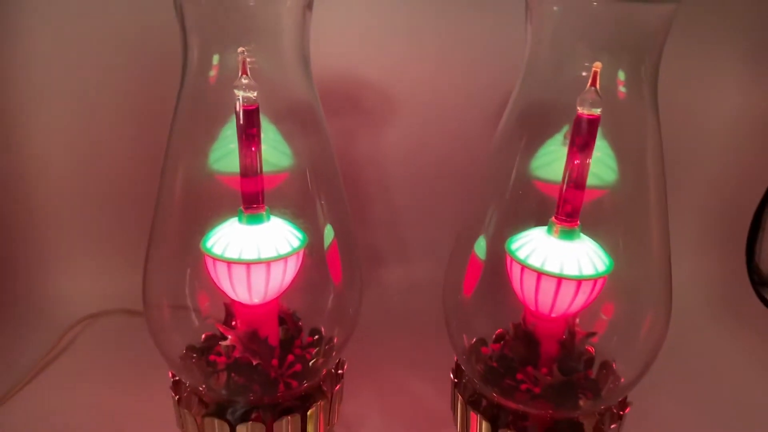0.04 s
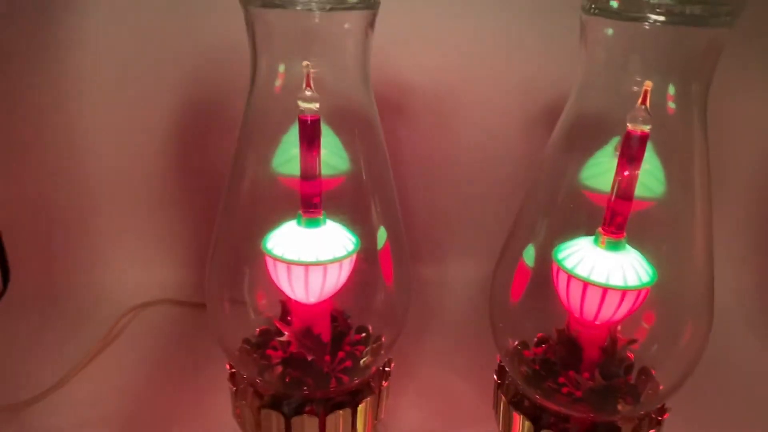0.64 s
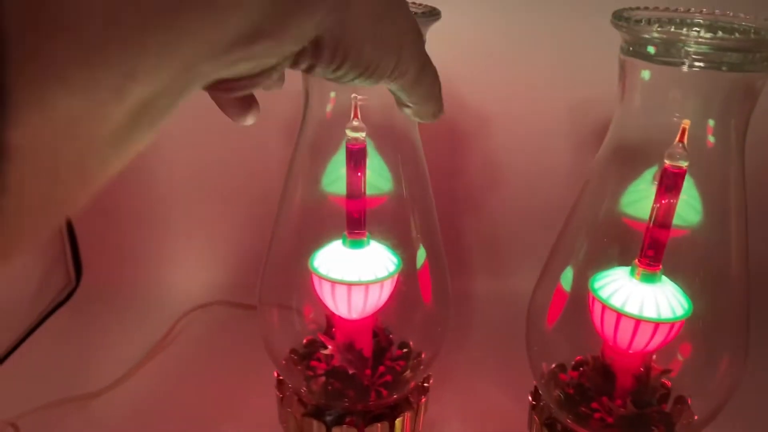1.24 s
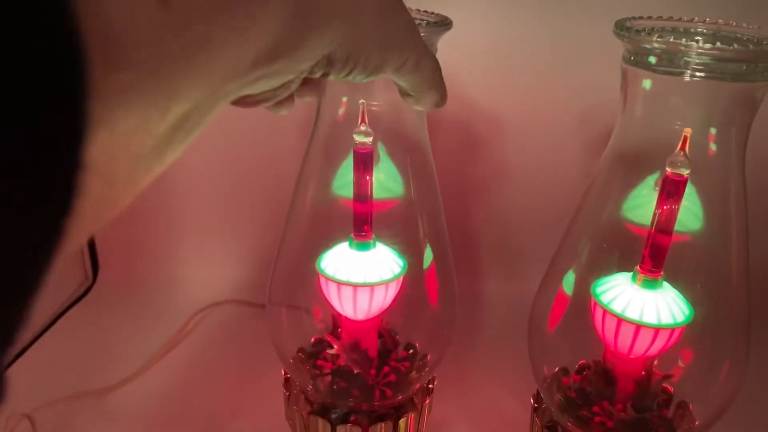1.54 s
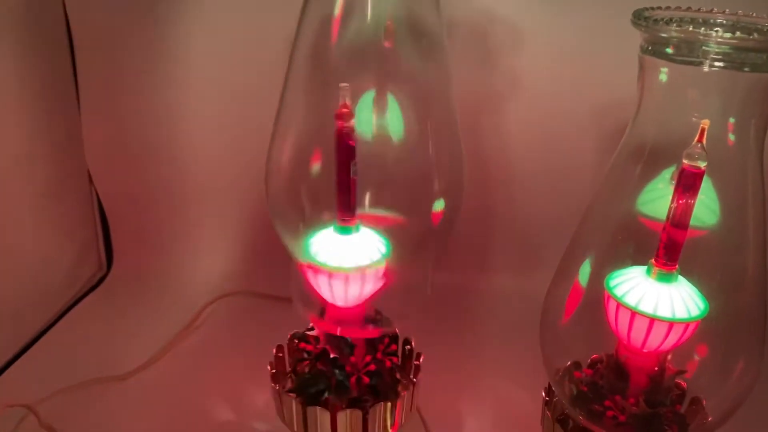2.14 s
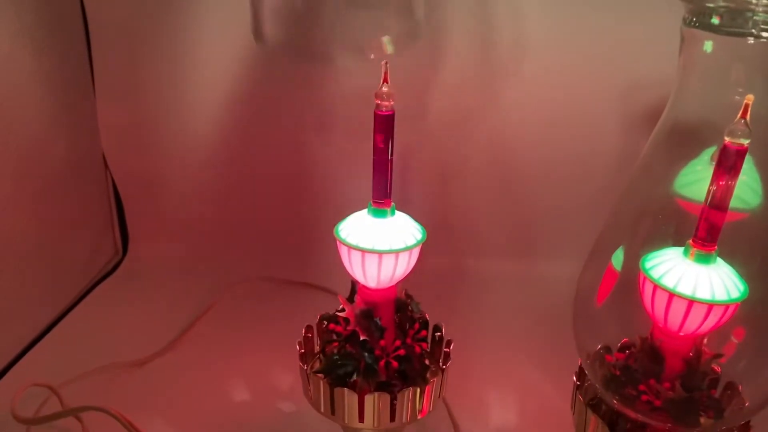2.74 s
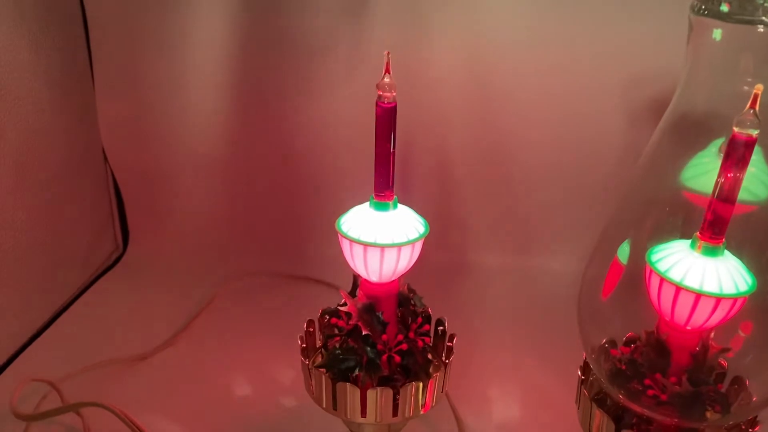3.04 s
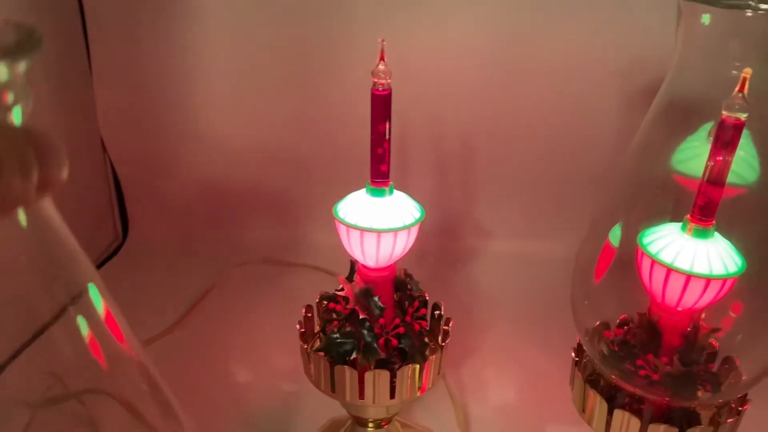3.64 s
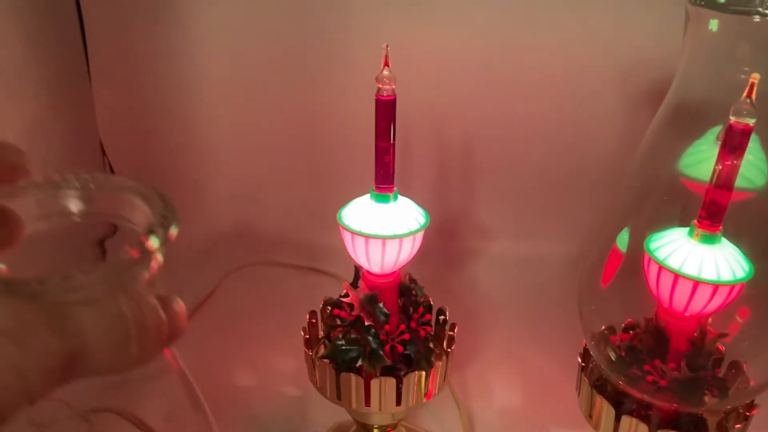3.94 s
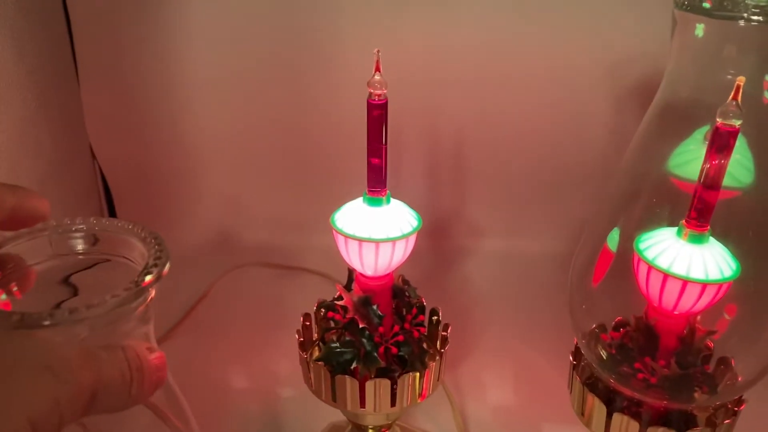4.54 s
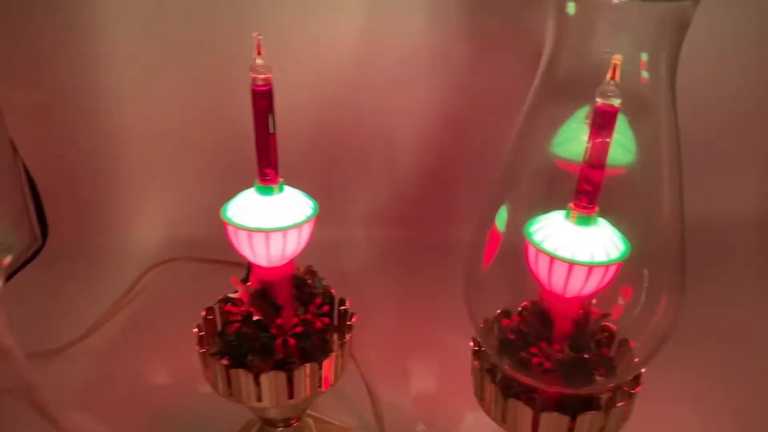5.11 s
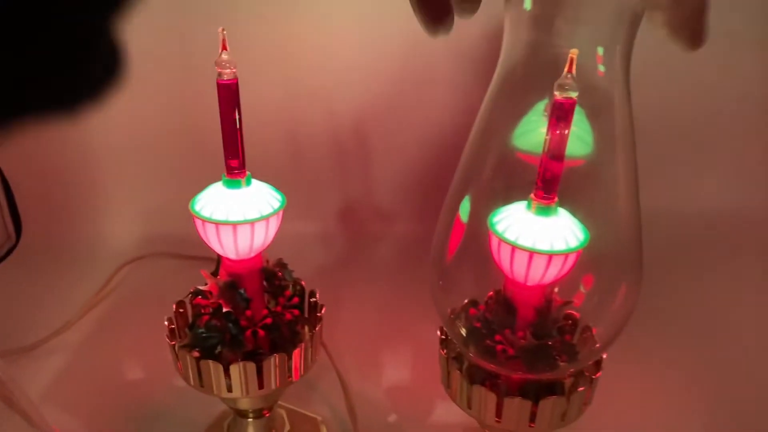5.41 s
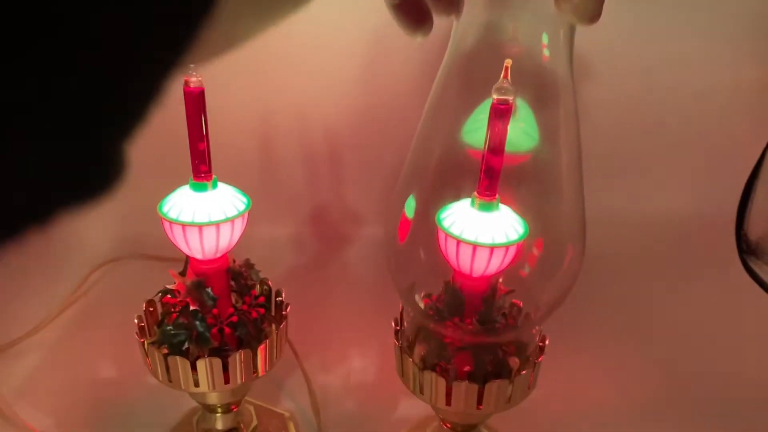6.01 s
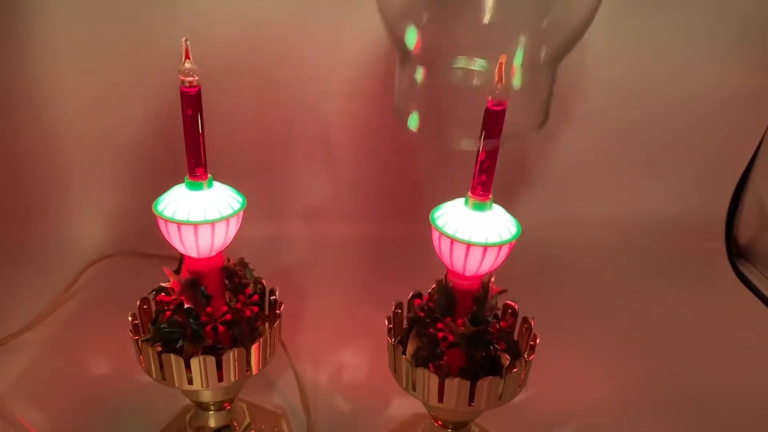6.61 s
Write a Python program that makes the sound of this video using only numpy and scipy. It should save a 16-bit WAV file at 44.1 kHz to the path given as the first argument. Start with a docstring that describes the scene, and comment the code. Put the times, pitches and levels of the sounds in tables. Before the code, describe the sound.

Close by in a quiet room, a glass lamp chimney scrapes out of its brass holder, the prongs snapping sharply off the rim. It clinks against the bulb and rings with a clear, wavering note. A sleeve rustles faintly and the glass is set on the table with a soft knock. Then a second chimney scrapes free, clinks and rings slightly higher, over a faint low rumble.

```python
"""A quiet room: two glass chimneys are lifted off small lamps, one after the other, close by.
Each scrapes out of its springy brass crown, whose prongs snap off the rim, then clinks against the bulb.
Uneven walls split the lowest bell mode of the glass in two, so its note beats.
The first chimney is set down on the table in between. Fingers tap, the table thuds,
and a sleeve rustles as the arm moves, over a low rumble and faint air."""
import sys
import numpy as np
from scipy import signal
from scipy.fft import rfft, irfft, next_fast_len
from scipy.io import wavfile
from scipy.ndimage import uniform_filter1d

SR = 44100
rng = np.random.default_rng(int(sys.argv[2]) if len(sys.argv) > 2 else 0)


def generate_wav(sig):
    """Save sig (samples, or channels by samples) to the path in sys.argv[1] as 16-bit PCM at SR."""
    pcm = np.round(np.clip(np.atleast_2d(sig).T, -1, 1) * 32767).astype(np.int16)
    wavfile.write(sys.argv[1], SR, pcm)


N = 298557
TIME = np.arange(N) / SR

# Levels are relative within each layer.
# spectra: f/Hz, level/dB
RUMBLE_SPECTRUM = [(15, -33.5), (28, -16.5), (40, 1), (60, 4.5), (105, 0.5), (135, -6), (193, -9.5),
                   (330, -25), (500, -42), (900, -89.5)]
AIR_SPECTRUM = [(100, 2), (250, 4.5), (500, 1), (900, -3), (1250, 3.5), (1700, -13.5), (2600, -15),
                (4000, -17), (6500, -20), (9000, -23), (15500, -31)]  # also the sleeve's folds
FIBRE_SPECTRUM = [(150, 6), (400, 4.5), (800, 7), (1200, 2), (1800, 0.5), (3200, 2.5), (5500, -1.5),
                  (8000, -7), (11000, -9.5), (15500, -8)]
SCRAPE_SPECTRUM = [(200, -11.5), (500, 5.5), (750, -1), (1100, -6.5), (1900, -4), (3600, -3), (5400, -3),
                   (6500, -5), (8000, -12), (10000, -19), (11500, -16.5), (15500, -27)]
PRONG_SPECTRUM = [(100, -12.5), (550, -12.5), (850, -21.5), (1500, 3), (2600, -2), (3700, 0), (4600, -8),
                  (6800, -8.5), (7800, -4.5), (8600, -12), (10000, -12), (11100, -10), (12200, -14),
                  (16000, -19)]
KNOCK_SPECTRUM = [(60, -4), (200, -5), (320, 1.5), (500, -5.5), (800, 3), (1050, -3), (1500, 4.5),
                  (2400, -4.5), (3200, -15.5), (5000, -21.5), (8000, -21.5), (11000, -25), (16000, -36.5)]

# room decay: f/Hz, t60/s
ROOM_DECAY = [(100, 0.3), (500, 0.12), (2000, 0.16), (8000, .15), (16000, 0.043)]
# likeness of left and right: f/Hz, coherence
COHERENCE = [(100, 1), (300, 0.51), (700, 0.5), (1800, 0.28), (3500, 0.23), (5300, .5), (7000, .8),
             (9000, 1), (16000, 0.99)]
# stereo widening, treble phase of the right channel against the left: f/Hz, lag/rad
WIDENING_LAG = [(100, 0), (7000, 0), (8000, -1.3), (9000, -3.1), (10000, -4.4), (10600, -6.28),
                (11600, -6.28), (13000, -9.4), (13700, -9.6), (14600, -12.57)]

# modes: f/Hz, level/dB, t60/s
TABLE_MODES = [(83.7, 0, 0.071), (103, -10, .08), (135, -16, 0.1), (170, -24, 0.26)]
RUBBED_MODES = [(485, -5, 0.071), (752.4, -3, 0.27), (2010, -4.5, .08), (2600, -2, 0.13), (3560, 0, .07),
                (3680, -3, .09), (4647, 0, .14), (6318, -1, 0.16), (7640, -6, 0.08), (11400, -10, .1)]
FOOT_MODES = [(535, -24, .22), (1442, -11.5, .1), (1795, -11, 0.058), (2420, -14, .115), (3159, -19, .13),
              (3215, -17, 0.15), (3510, -13.5, .12), (3665, 3, 0.075), (3736, -7, .13), (3900, -19, .073),
              (4210, -24.5, .7), (5960, -24, .14), (6285, -27, .22), (6450, -20, .14), (6750, -22, .15),
              (7500, -18.5, .14), (7700, -13, 0.17), (7520, -13.5, .16), (7842, -12, .11),
              (8150, -15.5, .2), (10950, -16, 0.17), (11030, -14.5, 0.16), (11330, -14.5, 0.33),
              (15150, -26.5, .1)]  # gripped chimney struck on its foot
BULB_MODES = [(400, -9, .07), (440, -9, .07), (555, -9, .07), (715, -5, .06), (750, -2, .06),
              (894, -6, .06), (1733, -5, .06), (1915, -6, .06), (2240, -8, .06), (2380, -7, .05)]  # plastic shade and stem
OVERTONES_A = [(2464, -13, .3), (2757, -18, 0.17), (3640, -8, .08), (3598, -11, .16), (4249, -35.5, .22),
               (4444, -4, 0.2), (5490, -18.5, 0.069), (6370, -29.5, 0.28), (6360, -19, 0.57),
               (6560, -15, .07), (7820, -23, 0.088), (7900, -15, .12), (10900, -23, 0.13),
               (12130, -32.5, .07), (14970, -38, .08)]  # first chimney
OVERTONES_B = [(2336, -12, .12), (2600, -21, .18), (3490, -12, .21), (3590, -17, .13), (3768, -27, .15),
               (4638, -4, .1), (4662, -12, .1), (6250, -18, .18), (7520, -18, .07), (8108, -26, .14),
               (8158, -24, .14), (10500, -28, .07)]  # second chimney
# split bell mode: f/Hz, level/dB, t60/s, balance/dB, right lag/rad, drift as the glass turns/(rad/s)
TWINS_A = [(1303.4, 0, 1.5, 5, -2.3, 4.6), (1323.9, 1, 1.05, -.5, 2, .9)]
TWINS_B = [(1352.6, 0, 1.35, -1, .7, -.8), (1378.4, -.3, 1.1, -1.5, -1.5, -1.4)]

# sleeve drags: t/s, length/s, catch/s, release/s, end level/dB
SLEEVE_DRAGS = [(0.557, 0.2, 0.035, 0.02, -61), (2.67, .23, 0.24, .045, -59),
                (2.954, 0.15, .02, 0.2, -64.5), (3.236, 0.064, 0.043, 0.13, -61),
                (4.04, .03, 0.021, 0.093, -69), (4.701, 0.239, 0.042, 0.022, -57.5),
                (5.3, .04, .03, .25, -83.5)]
# arm reaches: t/s of fastest motion, half length/s, level/dB
ARM_REACHES = [(0.805, 0.37, -74), (1.35, 0.27, -77), (2.939, 0.23, -68.5), (3.353, .2, -73.5),
               (4.092, 0.2, -72.5), (4.963, 0.21, -70.5), (5.249, 0.28, -92.5)]
# table thuds: t/s, level/dB
TABLE_THUDS = [(0.186, -39.5), (1.08, -46.5), (1.746, -41), (1.848, -37.5), (1.895, -35), (1.931, -23.5),
               (2.009, -23.5), (2.09, -27.5), (2.119, -31), (2.201, -32.5), (3.018, -38.5), (4.048, -30.5),
               (5.997, -27), (6.198, -38.5), (6.26, -33)]
# fingers, cord and glass on the table: t/s, knock level/dB, f/Hz, width/oct, tick level/dB
TABLE_TAPS = [(0.1775, -43, 704, 0.55, -59), (0.227, -53, 760, 1.3, -66.5), (1.0744, -50, 1560, 0.28, -68),
              (1.738, -44.5, 880, .9, -63.5), (3.024, -51, 278, 0.26, -85), (3.63, -66, 700, 1.5, -94.5),
              (3.912, -63, 1300, 1.5, -50), (3.97, -75, 1305, 1.5, -64), (4.037, -42, 1000, 1.5, -50),
              (4.042, -37.5, 354, 0.32, -76), (4.119, -77, 600, 1.5, -67), (4.275, -61.5, 600, 1, -91),
              (4.352, -66.5, 1130, 0.35, -80), (5.332, -69.5, 900, 1, -79), (5.59, -73, 888, 1, -79.5)]
# glass rubs crown, fingers or bulb: t/s, length/s, catch/s, end level/dB of scrape and of rub
GLASS_PULLS = [(1.417, 0.051, .03, -78, -93), (1.582, 0.038, 0.0086, -67.5, -83),
               (1.677, 0.15, 0.032, -60.5, -67.5), (1.791, 0.096, .004, -51, -70),
               (1.881, 0.067, 0.0064, -41.5, -53.5), (1.947, .15, .004, -53.5, -50.5),
               (2.101, 0.076, .004, -44, -53), (3.249, 0.19, 0.048, -72.5, -71),
               (5.784, 0.166, 0.071, -54.5, -78), (5.934, 0.05, 0.0023, -42, -56),
               (6.175, 0.11, 0.02, -50.5, -48)]
# prongs spring off the glass: t/s, ring level/dB, crack level/dB
PRONG_SNAPS = [(1.8025, -44.5, -41), (1.834, -57, -44.5), (1.8934, -12.5, -12.5), (1.903, -30, -20),
               (1.9277, -33, -27.5), (1.943, -39, -34), (2.004, -50, -40), (2.083, -60.5, -43.5),
               (5.9384, -47.5, -46.5)]
# blows on the glass: t/s, note level/dB, overtone level/dB, tilt/(dB/oct), knock level/dB
BLOWS_A = [(1.894, -47, -31.5, 6, -51), (2.1122, -18, -20.5, -1.5, -20), (2.1542, -42, -31.5, -0.5, -26.5),
           (2.168, -31.5, -36.5, 10, -24), (2.178, -42, -42, 3.5, -45.5), (2.1968, -38.5, -41, 3.5, -27.5)]
BLOWS_B = [(5.975, -60, -56, 0, -67), (5.992, -61.5, -70, 0.36, -44), (6.1951, -28.5, -34.5, 0.73, -27),
           (6.199, -19.5, -28, 0.12, -24.5), (6.2162, -19, -33.5, 0, -20), (6.226, -27, -38, 0.069, -36),
           (6.259, -34, -36, 1.95, -31)]
SET_DOWN_A = [(3.915, -42.5, -51, 0.0089, -50.5)]  # on the table, still gripped


def amp(db):
    """Decibels to gain."""
    return 10 ** (np.asarray(db) / 20)


def unit_rms(x):
    """Scales to rms 1."""
    return x / np.sqrt(np.mean(x ** 2) + 1e-20)


def lookup(points, hz):
    """Interpolates a table over log frequency."""
    f, value = np.transpose(points)
    return np.interp(np.log(hz + 1), np.log(f + 1), value)


def add(mix, at_s, sound):
    """Mixes a sound in at at_s."""
    part = mix[..., round(at_s * SR):][..., :sound.shape[-1]]
    part += sound[..., :part.shape[-1]]


def cohere(x):
    """Makes two unrelated signals as alike as at two close microphone ports."""
    size = x.shape[-1]
    n_fft = next_fast_len(size)
    a, b = rfft(x, n_fft)
    same = np.clip(lookup(COHERENCE, np.fft.rfftfreq(n_fft, 1 / SR)), -1, 1)
    return irfft(np.array([a, same * a + np.sqrt(1 - same ** 2) * b]), n_fft)[:, :size]


def noise(size=N):
    """Partly coherent stereo white noise."""
    return cohere(rng.standard_normal((2, size)))


def colour(x, spectrum, size=4096):
    """Minimum-phase filter of unit energy; spectrum: f/Hz, level/dB."""
    gain_db = np.maximum(lookup(spectrum, abs(np.fft.fftfreq(size, 1 / SR))), -100)
    log_response = np.conj(signal.hilbert(np.log(amp(gain_db))))
    fir = np.fft.ifft(np.exp(log_response)).real
    return signal.oaconvolve(x, fir[None] / np.linalg.norm(fir), axes=1)[:, :x.shape[1]]


def hump(hz, width_oct, slope_db_per_oct=3):
    """Spectrum with one broad peak, duller above it."""
    grid_hz = np.geomspace(40, 20000, 160)
    away_oct = np.log2(grid_hz / hz)
    peak_db = -20 * np.log10(1 + (away_oct / width_oct) ** 2)
    return np.c_[grid_hz, peak_db - slope_db_per_oct * np.maximum(away_oct, 0)]


def patchy(x, depth_db, size=1024):
    """Narrow bands swell and fade at random."""
    bands = signal.stft(x, nperseg=size)[2]
    patches = uniform_filter1d(rng.standard_normal(bands.shape[1:]), size=4, axis=0)
    patches = unit_rms(uniform_filter1d(patches, size=5, axis=1))
    return signal.istft(bands * amp(depth_db * patches), nperseg=size)[1][:, :N]


def grains(per_s, spread_db):
    """Tiny random slips of uneven size."""
    strength = amp(spread_db * np.minimum(rng.exponential(1, N), 4))
    slipping = rng.random(N) < per_s / SR
    return unit_rms(cohere(strength * slipping * rng.standard_normal((2, N))))


def pull(start_s, length_s, catch_s, release_s=0.0048, build_db_per_s=50):
    """Friction envelope: catches, grows as the hand pulls harder, lets go."""
    past_end_s = TIME - start_s - length_s
    catch = np.clip((TIME - start_s) / catch_s, 0, 1)
    build = amp(build_db_per_s * np.minimum(past_end_s, 0))
    return catch * build * np.exp(-np.clip(past_end_s / release_s, 0, 20))


def burst(t60_s, rise_s=0.00027, size=16384):
    """Dense modes dying together, as decaying noise."""
    t = TIME[:size]
    return noise(size) * amp(-60 * t / t60_s) * (1 - np.exp(-t / rise_s))


def ring(modes, tilt_db_per_oct=0, scatter_db=2, chatter_db=2, pivot_hz=4000, size=14000):
    """Damped sines of one blow; the spot hit scatters their level and left-right phase."""
    t, out = TIME[:size], np.zeros((2, size))
    sides = np.array([[1], [-1]])
    for (hz, db, t60_s), (phase, strength, lag) in zip(modes, rng.standard_normal((len(modes), 3))):
        level_db = db + scatter_db * strength + tilt_db_per_oct * np.log2(hz / pivot_hz)
        out += amp(level_db - 60 * t / t60_s) * np.sin(2 * np.pi * (hz * t + phase) + .5 * lag * sides)
    # rim chatter roughens the start; the tail fades smoothly to silence
    chatter = unit_rms(uniform_filter1d(rng.standard_normal(size), size=150)) * np.exp(-t / 0.072)
    taper = np.cos(np.pi / 2 * t / t[-1]) ** 2
    rise = 1 - np.exp(-t / .0009)
    return out * rise * amp(chatter_db * chatter) * taper


def background(rumble_db=-61.5, air_db=-78):
    """Lumpy low rumble under faint, restless air."""
    swell = unit_rms(np.interp(TIME, np.linspace(0, TIME[-1], num=70), rng.standard_normal(70)))
    rumble = unit_rms(colour(noise(), RUMBLE_SPECTRUM) * amp(3.1 * swell))
    air = patchy(colour(noise(), AIR_SPECTRUM), depth_db=4.0)
    return amp(rumble_db) * rumble * amp([[-.8], [.8]]) + amp(air_db) * air * amp([[1], [-1]])


def room(x, rise_s=0.0013, size=16384):
    """Small furnished room: a dense tail whose top treble dies first."""
    hz, t, bands = signal.stft(noise(size), SR, nperseg=256)
    decay = amp(-60 * t / lookup(ROOM_DECAY, hz)[:, None])
    tail = signal.istft(bands * decay, SR, nperseg=256)[1][:, :size]
    tail *= 1 - np.exp(-TIME[:size] / rise_s)
    return signal.oaconvolve(x, tail / np.linalg.norm(tail[0]), axes=1)[:, :N]


def sleeve(edge_drop_db=8.5):
    """Fibres brush past each other: uneven hiss over the slower rustle of folds."""
    fibres = patchy(colour(grains(per_s=14000, spread_db=1.0), FIBRE_SPECTRUM), depth_db=3.5)
    drag = sum(amp(db) * pull(*shape) for *shape, db in SLEEVE_DRAGS)
    folds = patchy(colour(noise(), AIR_SPECTRUM), depth_db=5.5)
    motion = sum(amp(db - edge_drop_db * np.minimum(((TIME - at_s) / half_s) ** 2, 10))
                 for at_s, half_s, db in ARM_REACHES)
    return amp(-2) * fibres * drag + folds * motion * amp([[1], [-1]])


def table_thuds(rise_s=0.0034):
    """The table top swings for a few cycles."""
    out, t = np.zeros(N), TIME[:SR // 2]
    swing = sum(amp(db - 60 * t / t60_s) * np.sin(2 * np.pi * hz * t) for hz, db, t60_s in TABLE_MODES)
    swing *= 1 - np.exp(-t / rise_s)
    for at_s, db in TABLE_THUDS:
        add(out, at_s, amp(db) * swing)
    return out * amp([[-.7], [.7]])


def table_taps():
    """Light contacts: a dull knock with a bright tick on top."""
    out = np.zeros((2, N))
    for at_s, knock_db, hz, width_oct, tick_db in TABLE_TAPS:
        add(out, at_s, amp(knock_db) * colour(burst(t60_s=.045), hump(hz, width_oct)))
        add(out, at_s, amp(tick_db) * colour(burst(t60_s=.1), hump(hz=5900, width_oct=1.7)))
    return out


def air_column(at_s=1.741, level_db=-50, start_hz=440, glide_hz_per_s=450, t60_s=.3):
    """A palm closes over the first chimney; the air inside hums, rising as the hand settles."""
    out, t = np.zeros((2, N)), TIME[:SR // 2]
    cycles = np.cumsum(start_hz + glide_hz_per_s * t) / SR
    envelope = amp(level_db - 60 * t / t60_s) * (1 - np.exp(-t / .003))
    add(out, at_s, envelope * np.sin(2 * np.pi * cycles))
    return out


def glass_slides():
    """Stick-slip scrapes, sets the brass crown ringing faintly and rubs dully through the lamp."""
    scrape_envelope = sum(amp(db) * pull(*shape) for *shape, db, _ in GLASS_PULLS)
    rub_envelope = sum(amp(db) * pull(*shape) for *shape, _, db in GLASS_PULLS)
    slips = grains(per_s=4200, spread_db=0.5) * scrape_envelope
    rub = grains(per_s=3000, spread_db=2.5) * rub_envelope
    body = ring(RUBBED_MODES, scatter_db=0.5)
    singing = signal.oaconvolve(slips, body / np.linalg.norm(body[0]), axes=1)[:, :N]
    scrape = patchy(colour(slips, SCRAPE_SPECTRUM), depth_db=3.5)
    return amp(-5.5) * scrape + amp(-6) * singing + colour(rub, hump(hz=720, width_oct=1.8))


def prong_snaps():
    """Brass prongs slip off the rim: each cracks and rings the foot of the glass."""
    rings, cracks = np.zeros((2, N)), np.zeros((2, N))
    for at_s, ring_db, crack_db in PRONG_SNAPS:
        add(rings, at_s, amp(ring_db) * ring(FOOT_MODES, scatter_db=1.0))
        add(cracks, at_s, amp(crack_db - 2) * burst(t60_s=0.072))
    return rings * amp([[1], [-1]]) + colour(cracks, PRONG_SPECTRUM)


def clinks(modes, blows):
    """Glass overtones plus the dry knock of the part hit."""
    rings, cracks = np.zeros((2, N)), np.zeros((2, N))
    for at_s, _, overtone_db, tilt_db_per_oct, knock_db in blows:
        add(rings, at_s, amp(overtone_db) * ring(modes, tilt_db_per_oct))
        add(rings, at_s, amp(knock_db - 5.5) * ring(BULB_MODES))
        add(cracks, at_s, amp(knock_db - 3) * burst(t60_s=.05))
    return rings + colour(cracks, KNOCK_SPECTRUM)


def bell_note(twins, blows, start_s, grip_db_per_s=0, contact_db=4.5, upper_start=0.24, fill_s=0.048):
    """Blows add energy to the twin modes; as the upper fills in, they beat from side to side."""
    out, age_s = np.zeros((2, N)), TIME[:2 * SR]
    t = TIME - start_s
    rise = 1 - np.exp(-age_s / 0.00037)
    contact = amp(contact_db * np.exp(-age_s / 0.14) - 6.5)  # lingering contact speeds the early decay
    upper_share = 1 - (1 - upper_start) * np.exp(-(t / fill_s) ** 4)
    for (hz, db, t60_s, pan_db, lag_rad, drift_rad_per_s), share in zip(twins, (1, upper_share)):
        fade = rise * contact * amp(db - (60 / t60_s + grip_db_per_s) * age_s)
        energy = np.zeros(N)
        for at_s, note_db, *_ in blows:
            add(energy, at_s, (amp(note_db) * fade) ** 2)
        phase_rad = 2 * np.pi * hz * t
        left = amp(pan_db / 2) * np.sin(phase_rad)
        right = amp(-pan_db / 2) * np.sin(phase_rad - lag_rad - drift_rad_per_s * t)
        out += share * np.sqrt(energy) * np.array([left, right])
    return out


def scene():
    """Contact sounds with their room tail; bell notes, thuds, sleeve and background dry."""
    contacts = clinks(OVERTONES_A, BLOWS_A) + clinks(FOOT_MODES, SET_DOWN_A)
    contacts += clinks(OVERTONES_B, BLOWS_B)
    contacts += prong_snaps() + glass_slides() + table_taps() + air_column()
    notes = bell_note(TWINS_A, BLOWS_A, start_s=2.116) + bell_note(TWINS_B, BLOWS_B, start_s=6.197)
    gripped = bell_note(TWINS_A[:1], SET_DOWN_A, start_s=SET_DOWN_A[0][0], grip_db_per_s=108)
    return contacts + amp(-10.5) * room(contacts) + notes + gripped + table_thuds() + sleeve() + background()


def record(dry, low_cut_hz=42, high_cut_hz=16000):
    """Bass cut, stereo widening by a phase shift of the right channel's treble, band limit."""
    n_fft = next_fast_len(N + 4096)
    highpass = signal.butter(3, low_cut_hz, "high", fs=SR, output="sos")
    left, right = rfft(signal.sosfilt(highpass, dry), n_fft)
    lag_rad = lookup(WIDENING_LAG, np.fft.rfftfreq(n_fft, 1 / SR))
    widened = irfft(np.array([left, right * np.exp(-1j * lag_rad)]), n_fft)[:, :N]
    lowpass = signal.firwin(511, high_cut_hz, window=("kaiser", 9), fs=SR)
    return signal.oaconvolve(widened, lowpass[None], "same")


dry = scene()
out = record(dry)
generate_wav(out)
```